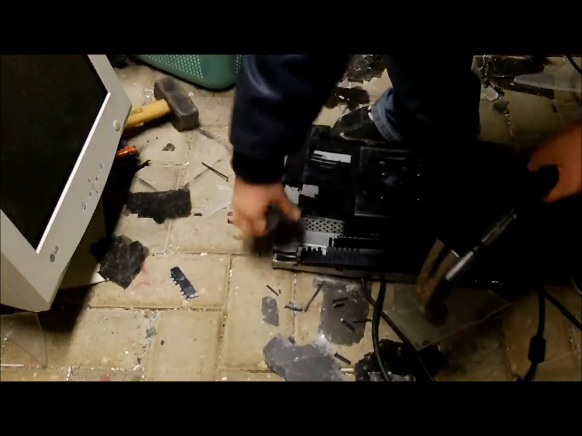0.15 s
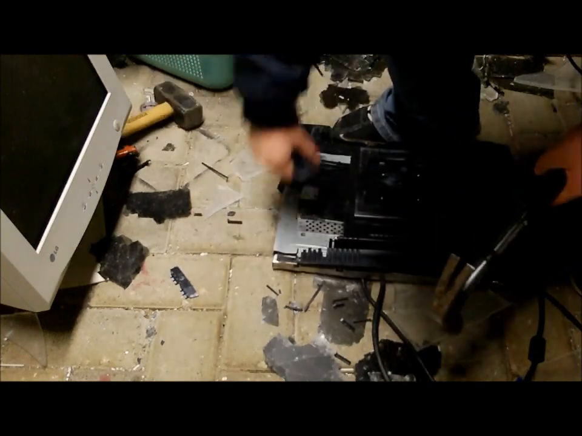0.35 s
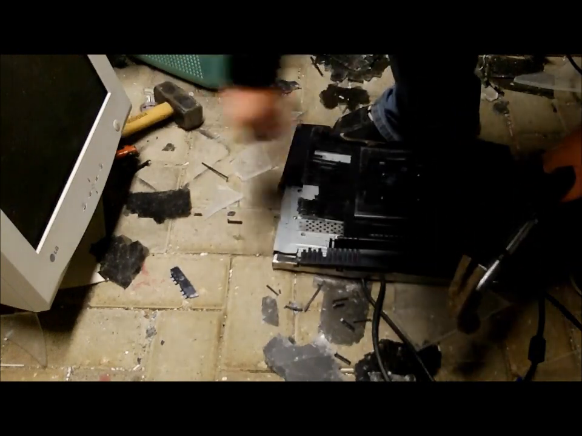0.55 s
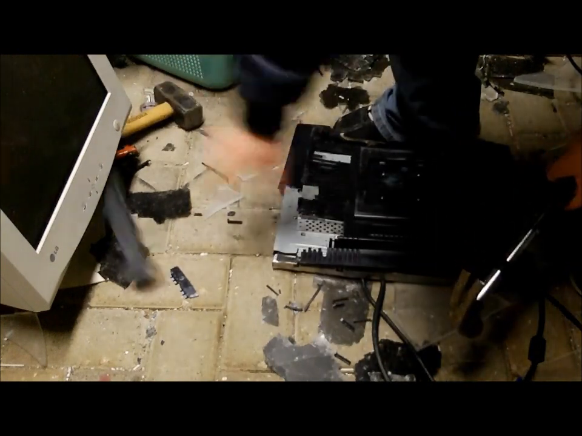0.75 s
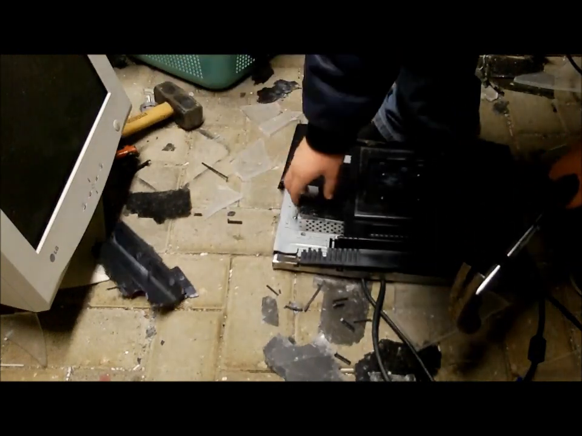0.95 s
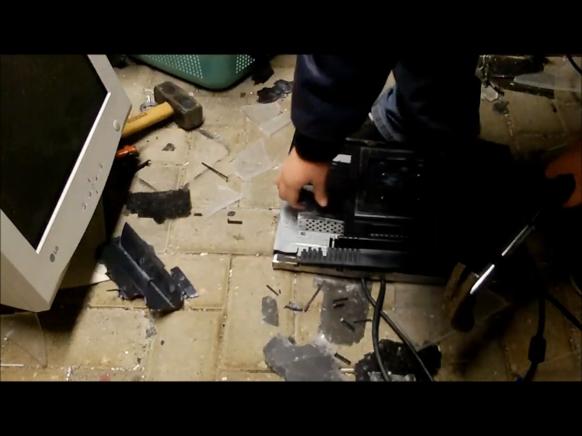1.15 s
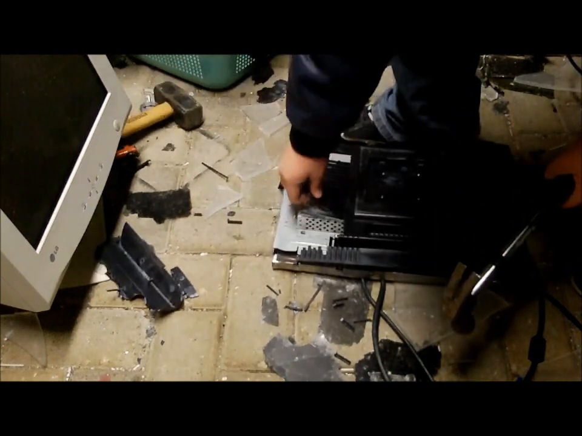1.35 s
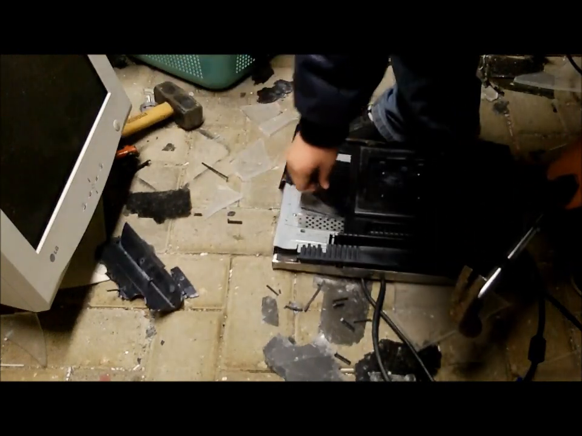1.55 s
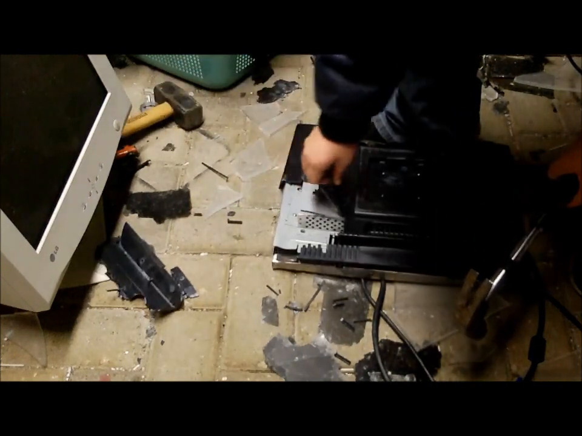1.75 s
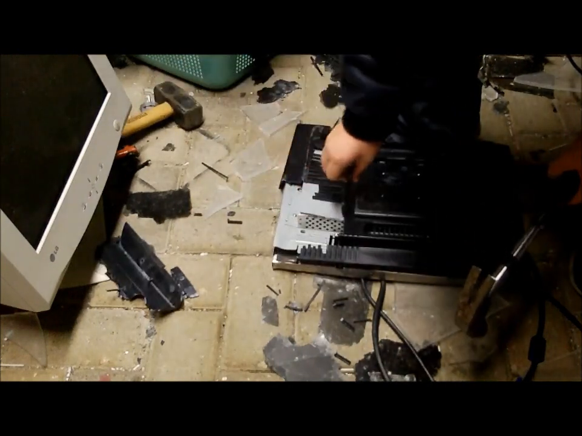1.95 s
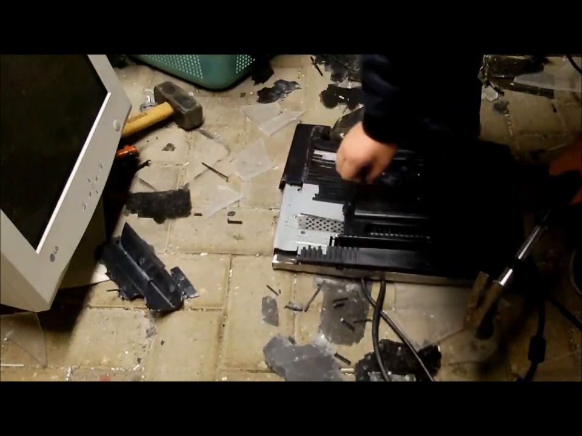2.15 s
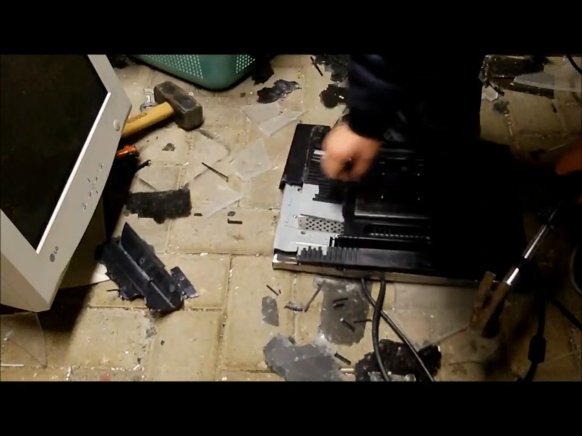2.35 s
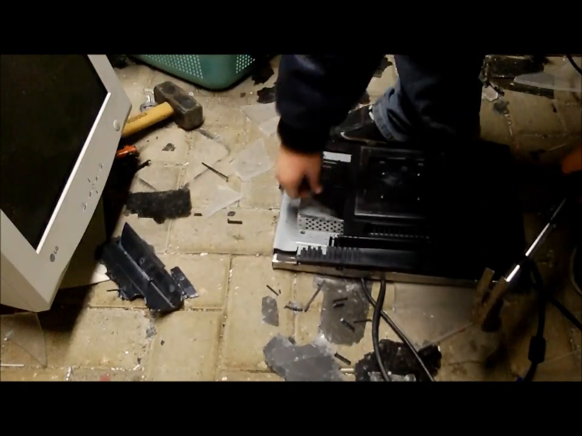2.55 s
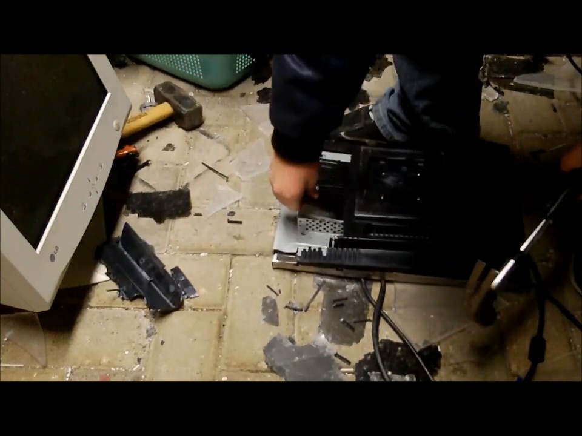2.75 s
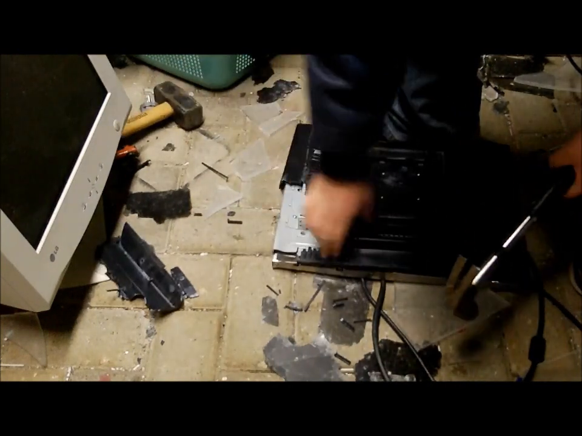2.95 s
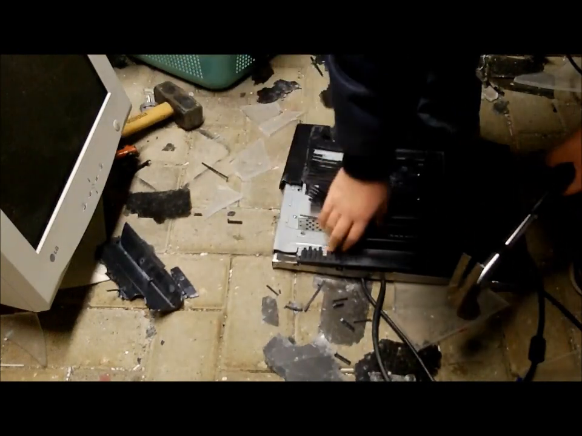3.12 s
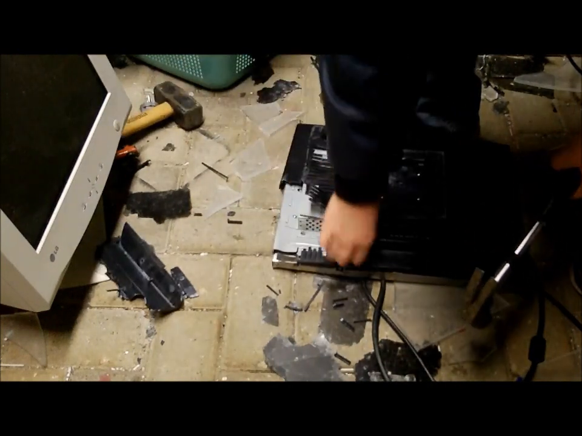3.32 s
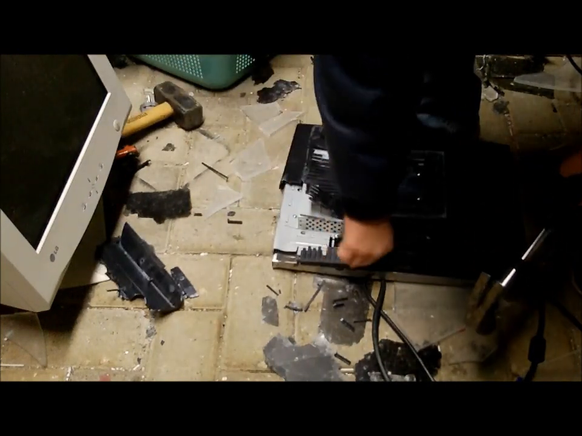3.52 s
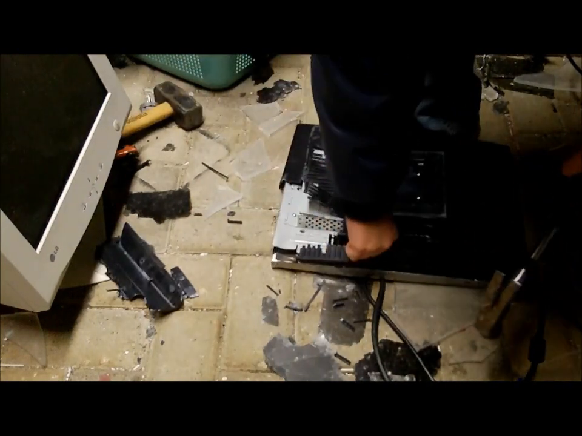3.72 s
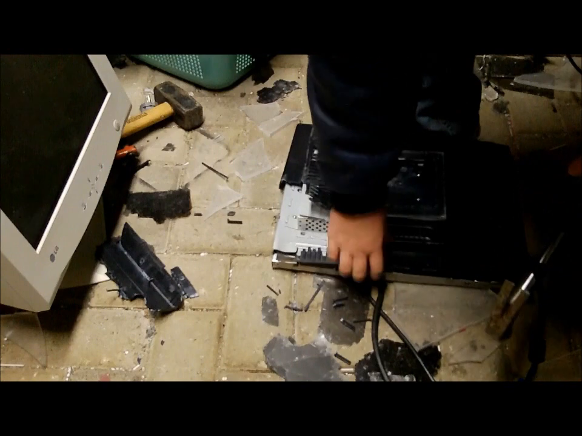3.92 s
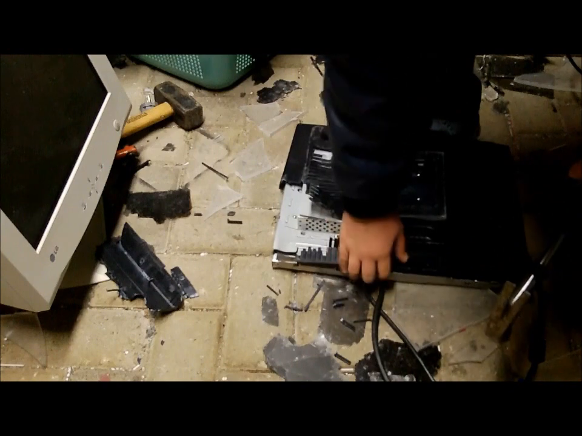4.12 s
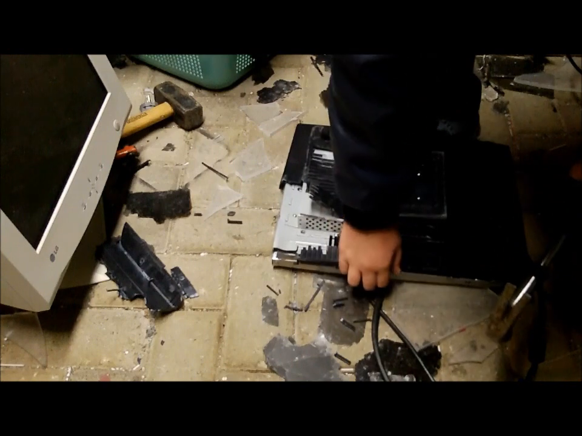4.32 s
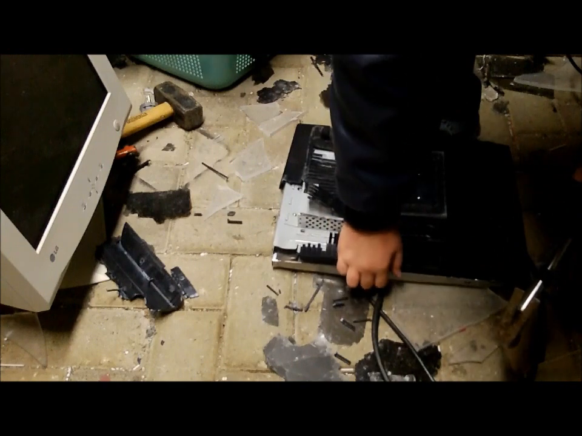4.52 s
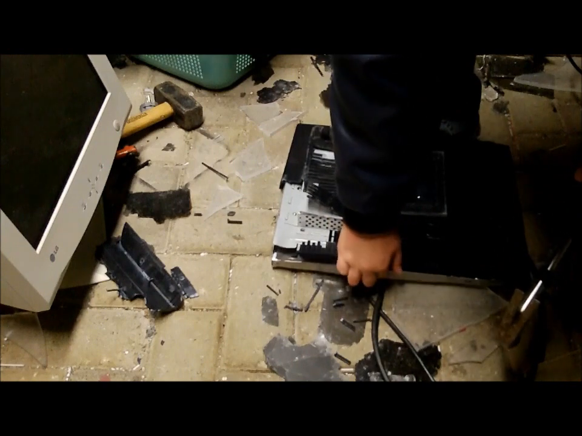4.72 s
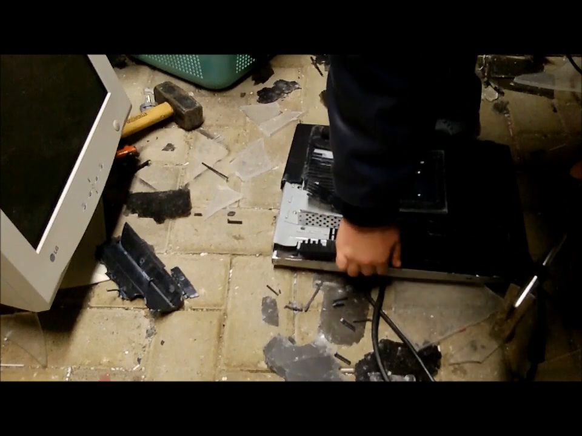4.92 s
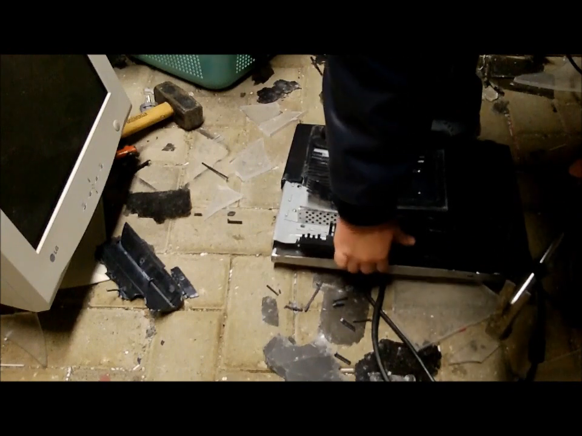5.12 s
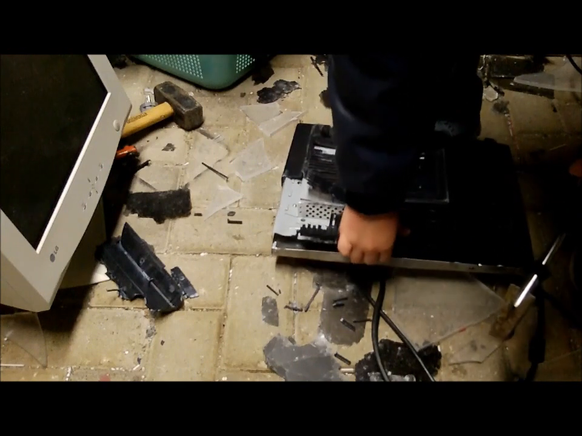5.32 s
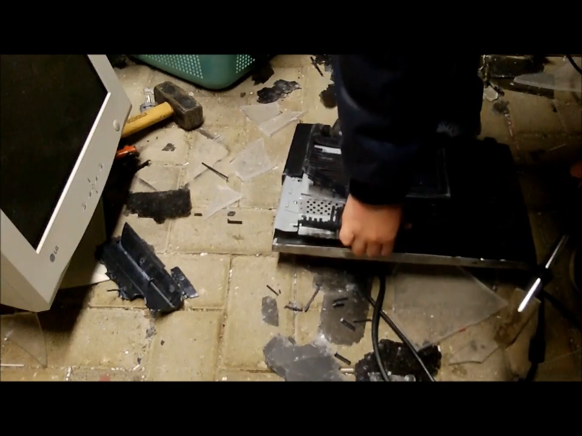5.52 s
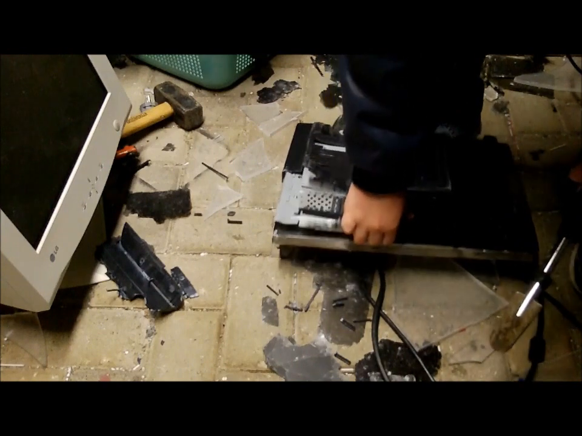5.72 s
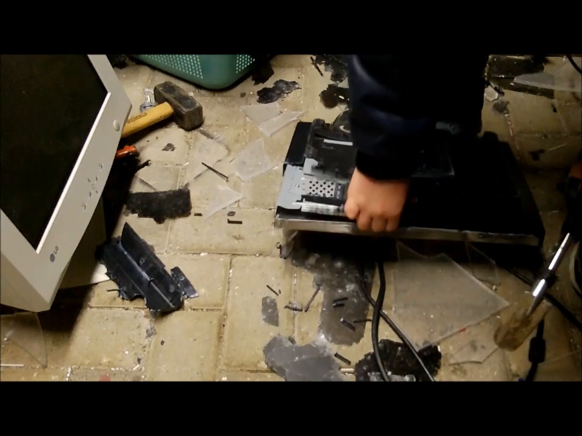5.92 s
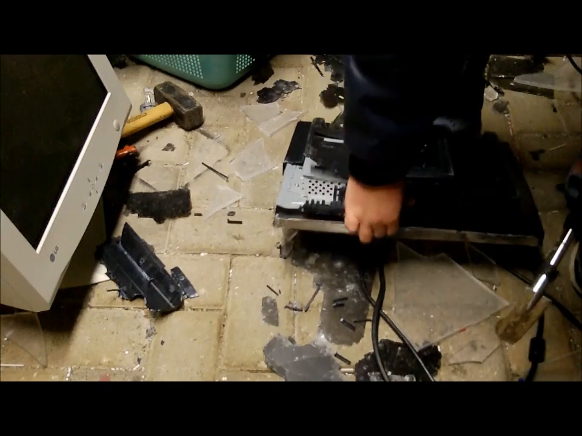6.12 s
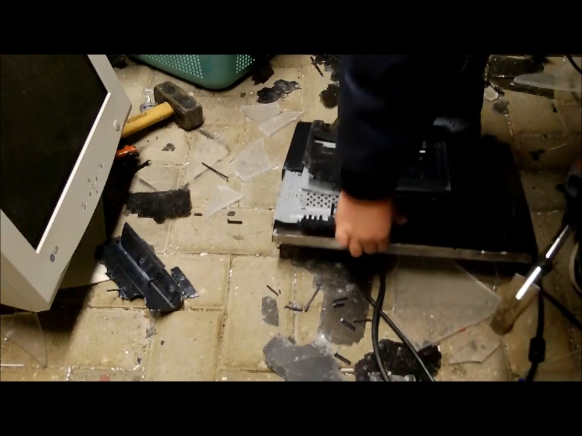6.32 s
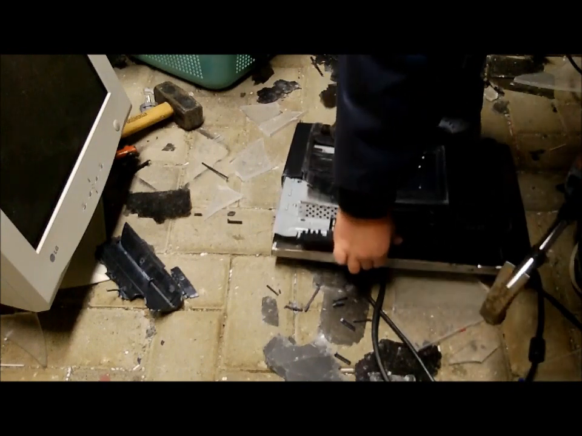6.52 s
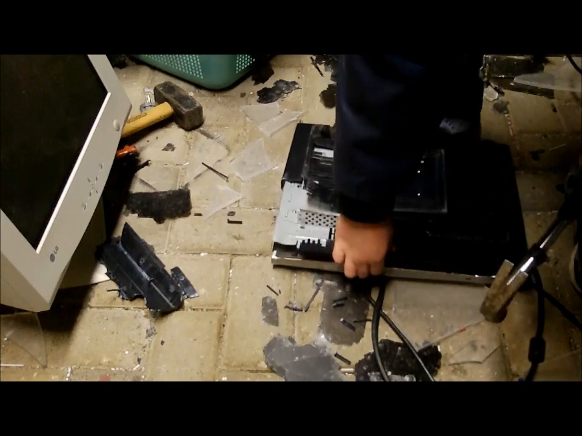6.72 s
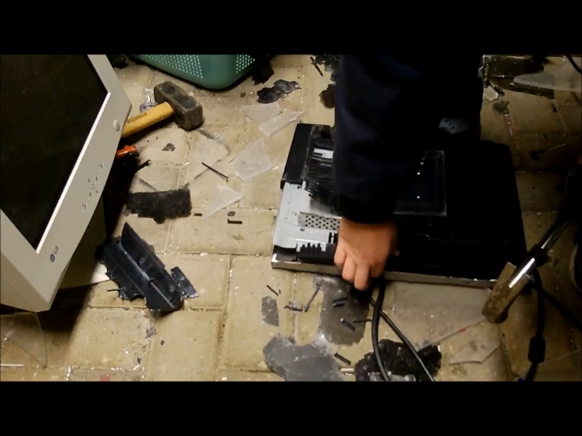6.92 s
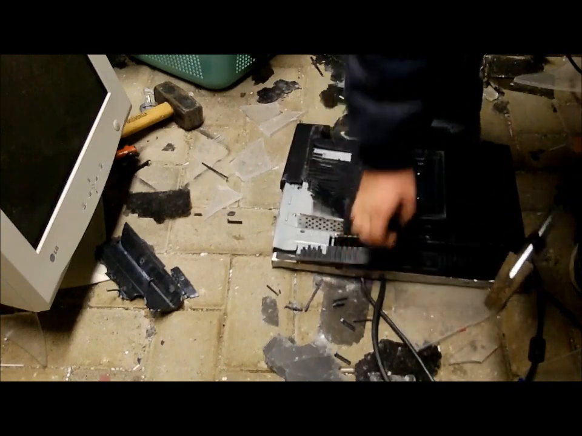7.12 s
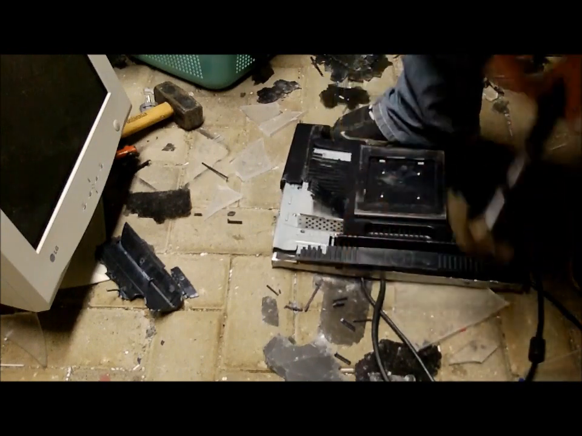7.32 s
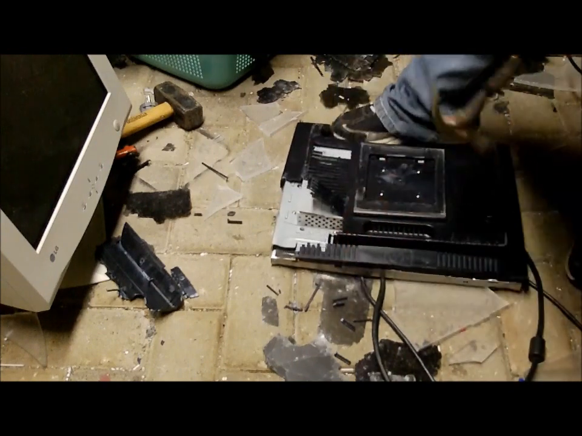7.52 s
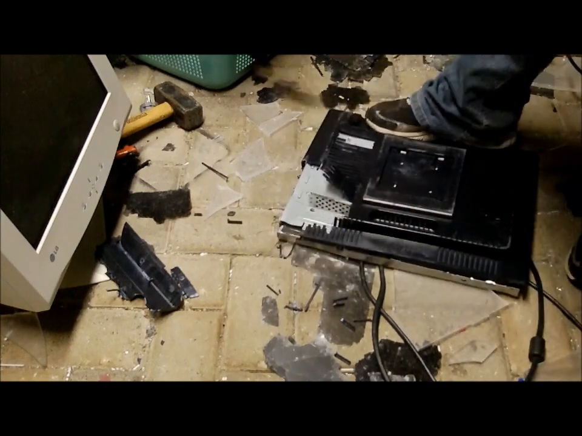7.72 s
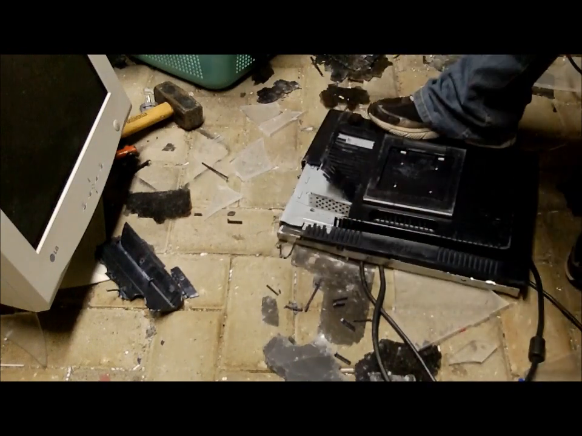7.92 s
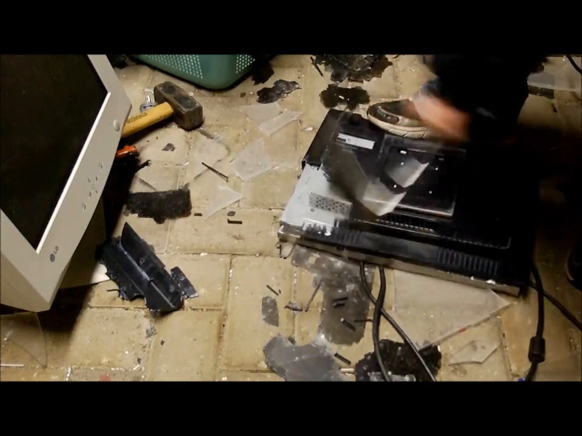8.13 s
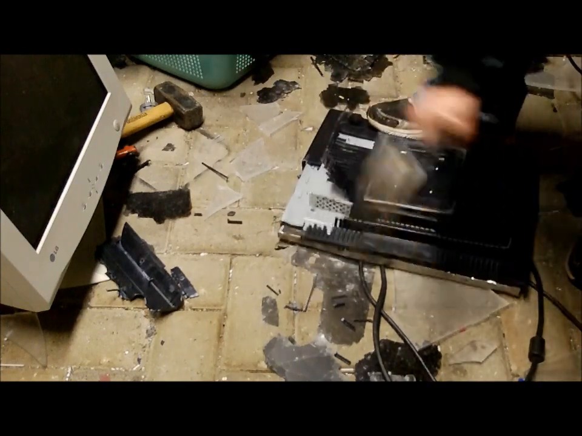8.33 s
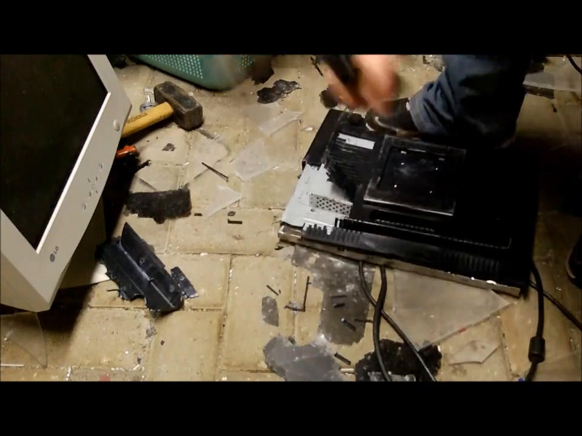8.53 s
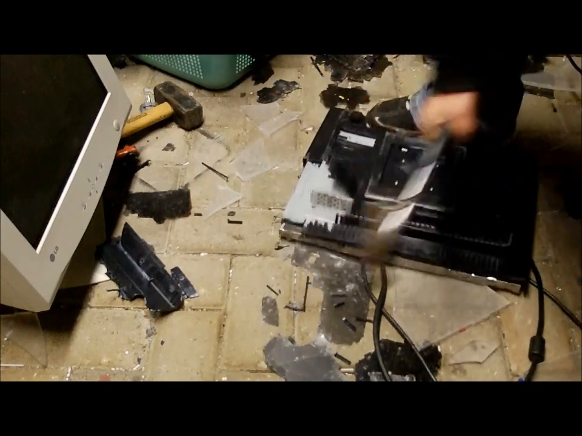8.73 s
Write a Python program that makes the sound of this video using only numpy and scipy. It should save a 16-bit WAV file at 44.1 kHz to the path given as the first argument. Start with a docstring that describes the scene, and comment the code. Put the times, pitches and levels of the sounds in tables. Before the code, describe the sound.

A plastic strip tears off a flat monitor with loud cracks, then lands and bounces on the tiled floor. Smaller snaps, ticks and gritty hand rubbing follow as the back is pried. The case clacks, drops and clatters with a short skid under a shoe. Two very loud hammer blows crunch into it, overloading the close microphone. The room is small and hard, with a faint rumble and hiss.

```python
"""Breaking up a flat monitor

On the tiled floor of a small hard room, a strip of the plastic back is torn off and thrown,
more plastic snaps, the case is lifted, dropped and stepped on, and two hammer blows smash into it.
Each hit is a spray of micro-cracks that sets one part and the room ringing; rubbing is many tiny
slips. The loud hits overload the close microphone."""
import sys
import numpy as np
from scipy import signal
from scipy.io import wavfile

SR = 44100
rng = np.random.default_rng(int(sys.argv[2]) if len(sys.argv) > 2 else 0)


def master_out(mix):
    """Clip the mix to full scale and print it as 16-bit PCM to the path in sys.argv[1]."""
    frames = np.transpose(np.atleast_2d(mix))
    ceiling = np.clip(frames, -1, 1)
    pcm = np.round(ceiling * 32767).astype(np.int16)
    wavfile.write(sys.argv[1], SR, pcm)


N = 386316
TOP_HZ = 16000


def amp(db):
    """Decibels to gain."""
    return 10 ** (np.asarray(db) / 20)


def unit(x):
    """Scales to rms 1."""
    return x / np.sqrt(np.mean(x ** 2) + 1e-20)


def read(curve, hz):
    """Reads a curve on a log-frequency axis."""
    f, value = np.transpose(curve)
    return np.interp(np.log(hz + 1), np.log(f + 1), value)


def add(mix, start_s, sound):
    """Adds a sound into the mix."""
    part = mix[max(round(start_s * SR), 0):][:len(sound)]
    part += sound[:len(part)]


def colour(x, curve, size=2048):
    """Minimum-phase filter along a curve of f/Hz, gain/dB."""
    log_gain = np.log(amp(read(curve, abs(np.fft.fftfreq(size, 1 / SR)))))
    taps = np.fft.ifft(np.exp(np.conj(signal.hilbert(log_gain)))).real
    return signal.oaconvolve(x, taps[:size // 2])[:len(x)]


def drift(t, per_s, count=256):
    """Random wander of about unit size."""
    return np.interp(t * per_s, np.arange(count), rng.standard_normal(count))


# background spectrum: f/Hz, gain/dB
NOISE_COLOUR = [(10, -4.5), (27, 9), (45, -5.5), (70, -1.5), (125, -13), (250, -19), (600, -20.5),
                (1300, -22.5), (2500, -29), (5000, -32), (10000, -36), (14500, -28), (16000, -40)]

def background(level_db, swell_db):
    """Low rumble and even hiss, swelling slightly."""
    gain = amp(level_db + swell_db * drift(np.arange(N) / SR, 6.4))
    return gain * unit(colour(rng.standard_normal(N), NOISE_COLOUR, size=8192))


# hum tones: f/Hz, level/dB, start/s, end/s
HUM_TONES = [(135, -40.5, 4.55, 4.98), (201, -52, 4.6, 7.1), (203, -45, 5.0, 5.4), (306, -57.5, 1.9, 8.1)]

def far_hum(waver, flutter_db):
    """Faint low tones come and go, wavering in pitch and level."""
    out = np.zeros(N)
    for hz, db, start_s, end_s in HUM_TONES:
        t = np.arange(0, end_s - start_s, 1 / SR)
        pitch_hz = hz * (1 + waver * drift(t, 4.2))
        tone = unit(np.sin(2 * np.pi * np.cumsum(pitch_hz) / SR))
        gain = amp(db + flutter_db * drift(t, 8.3))
        add(out, start_s, gain * tone * signal.windows.tukey(len(t), 0.4))
    return out


# room reverberation: f/Hz, t60/s
ROOM_DECAY = [(100, 0.26), (400, 0.29), (1000, 0.31), (2200, 0.36), (4500, 0.35), (9000, 0.31),
              (16000, 0.26)]

def room_echoes(build_s, size=256):
    """Dense echoes of energy 1 build up and die, in a new pattern for each spot."""
    hz, t, spectra = signal.stft(rng.standard_normal(SR // 2), SR, nperseg=size)
    decay = np.exp(-np.log(1000) * t / read(ROOM_DECAY, hz)[:, None])
    tail = signal.istft(spectra * decay, SR, nperseg=size)[1][:SR // 2]
    tail *= np.sqrt(1 - np.exp(-np.arange(len(tail)) / SR / max(build_s, 1e-4)))
    return tail / np.linalg.norm(tail)


def pressure(strokes, attack_s, release_s):
    """Each stroke bears down, holds and lets go."""
    out = np.zeros(N)
    for start_s, length_s, db in strokes:
        t = np.arange(0, length_s + 10 * release_s, 1 / SR)
        release = np.exp(-np.maximum(t - length_s, 0) / release_s)
        add(out, start_s, amp(db) * np.minimum(t / attack_s, 1) * release)
    return out


def rubbing(strokes, contact, gain_db, slips_per_s, spread_db, attack_s, release_s):
    """Gritty friction: tiny slips of uneven size under the stroke's pressure, plus room echoes."""
    slips = (rng.random(N) < slips_per_s / SR) * rng.standard_normal(N)
    slips *= amp(spread_db * np.minimum(rng.exponential(1, N), 4))
    direct = unit(colour(slips, contact)) * pressure(strokes, attack_s, release_s)
    return amp(gain_db) * (direct + signal.oaconvolve(direct, room_echoes(0.002))[:N])


# drags: t/s, length/s, level/dB
DRAG_STROKES = [(0, 0.28, -29.5), (4.29, 0.52, -42.5), (4.9, 2, -48)]
# case on floor: f/Hz, gain/dB
DRAG_CONTACT = [(20, -25), (60, 0), (140, -1), (300, -9), (700, -12.5), (2000, -42), (8000, -44)]

def case_drag():
    """The case rumbles as it is dragged and tilted on the floor."""
    return rubbing(DRAG_STROKES, DRAG_CONTACT, gain_db=-3.5, slips_per_s=1500, spread_db=2,
                   attack_s=0.01, release_s=0.042)


# grips: t/s, length/s, level/dB
HAND_STROKES = [(.03, 0.14, -23.5), (1.36, .17, -40), (2.33, 0.25, -42), (3.04, .1, -56),
                (3.282, 0.036, -24.5), (3.46, 0.091, -42), (3.73, .15, -32), (3.97, 0.64, -54.5),
                (4.42, 0.667, -40.5), (5.92, 0.39, -48), (6.84, .4, -38.5), (7.92, 0.35, -41)]
# hand on plastic: f/Hz, gain/dB
HAND_CONTACT = [(100, -18), (350, 6), (750, 1.5), (1500, -2.5), (2500, -5.5), (5000, -8), (11000, -14),
                (16000, -44)]

def hand_rub():
    """A hand grips and works at the case."""
    return rubbing(HAND_STROKES, HAND_CONTACT, gain_db=-5.5, slips_per_s=740, spread_db=3.5,
                   attack_s=0.01, release_s=0.021)


# slides: t/s, length/s, level/dB
SLIDE_STROKES = [(1.41, 0.034, -43.5), (4.445, 0.084, -45), (4.75, .05, -39), (5.88, 0.24, -48),
                 (6.365, 0.097, -50), (7.3, .08, -33.5), (7.44, 0.21, -38.5)]
# sleeve or shoe on plastic: f/Hz, gain/dB
SLIDE_CONTACT = [(100, -4), (500, 0.5), (1500, -0.5), (4500, 1), (7000, -5), (11000, -2), (16000, -13)]

def sleeve_and_shoe():
    """Sleeve and shoe slide over the case."""
    return rubbing(SLIDE_STROKES, SLIDE_CONTACT, gain_db=1, slips_per_s=1800, spread_db=-1.5,
                   attack_s=0.05, release_s=0.02)


def fracture(t, crumble_s, jolt_db, grain_db):
    """A first jolt, then a dying spray of micro-cracks of uneven size."""
    jolt = rng.standard_normal(len(t)) * np.exp(-t / 0.00034)
    sizes = amp(grain_db * np.repeat(rng.standard_normal(len(t)), SR // 1000)[:len(t)])  # 1 ms grains
    spray = rng.standard_normal(len(t)) * sizes * np.exp(-t / max(crumble_s, 1e-4))
    return amp(jolt_db) * unit(jolt) + unit(spray)


def ring(t, modes, waver, spot_db=4):
    """Dying modes vary in level with the spot struck and beat once their echoes arrive."""
    beat = waver * (1 - np.exp(-t / 0.017))
    out = np.zeros(len(t))
    for hz, db, t60_s in modes:
        envelope = amp(db + spot_db * rng.standard_normal()) * np.exp(-np.log(1000) * t / t60_s)
        phase = 2 * np.pi * hz * t + beat * drift(t, 90)
        out += envelope * np.sin(phase) * (1 + beat * drift(t, 91.8))
    return out


# thud, middle, edge and snap bands: low/Hz, high/Hz
HIT_BANDS = [(150, 900), (900, 2500), (2500, 7000), (7000, 16000)]

def balance(x, levels_db):
    """Filters a hit towards four band levels over its first 30 ms."""
    hz, power = signal.periodogram(x[:round(0.03 * SR)], SR, scaling="spectrum")
    have_db = [10 * np.log10(power[(hz >= lo) & (hz < hi)].sum() + 1e-20) for lo, hi in HIT_BANDS]
    thud, middle, edge, snap = np.subtract(levels_db, have_db)
    curve = [(720, thud), (1100, middle), (2200, middle), (2900, edge), (6000, edge), (9000, snap)]
    return colour(x, curve)


def hits(rows, contact, modes, gain_db, wet_db, jolt_db, grain_db, waver,
         crumble_s, ring_db, edge_db, edge_share, ripple_db=4):
    """Fractures that echo and ring one part. A row's thud and snap are relative to its mid-band level."""
    out, t = np.zeros(N), np.arange(SR // 2) / SR
    hz = np.geomspace(80, TOP_HZ, 60)
    for start_s, db, thud_db, snap_db in rows:
        spray_s = crumble_s * amp(0.14 * db)  # stronger hits crumble longer
        # each spot has its own damped resonances
        spot = np.transpose([hz, read(contact, hz) + ripple_db * rng.standard_normal(len(hz))])
        direct = unit(colour(fracture(t, spray_s, jolt_db, grain_db), spot))
        echoes = unit(colour(room_echoes(0.0005 + spray_s), spot))
        ringing = amp(ring_db - 0.67 * snap_db) * unit(ring(t, modes, waver))  # brittle hits ring less
        sound = unit(direct + amp(wet_db) * echoes) + ringing
        bands_db = [thud_db, 0, edge_db + edge_share * snap_db, snap_db]
        add(out, start_s, amp(db + gain_db) * balance(sound, bands_db))
    return out


# cracks: t/s, level/dB, thud/dB, snap/dB
CRACK_HITS = [(0.1842, -12.5, -5.5, 0), (1.3367, -55, -15, 4), (1.8402, -14.5, -5, 6),
              (2.0839, -34.5, -10, 6), (2.118, -19, -6, 12), (2.5296, -49, 3, 1), (2.6522, -31.5, -3.5, -1),
              (2.8252, -27.5, -11.5, -6), (3.1275, -42, 3.5, -4), (3.5629, -51.5, 11, 5.5),
              (3.754, -38, 8, 0), (3.7719, -27.5, 2.5, -0.5), (4.4449, -37, 4, -4.5),
              (4.512, -39.5, 0, -13), (5.1296, -35.5, -2, -6.5), (5.4958, -35, -17, -4.5),
              (5.8745, -47.5, -13, 2), (7.1203, -40.5, 5, 12.5), (8.4313, -36, -2.5, 11),
              (8.476, -46.5, -8, 16.5)]
# cracking plastic: f/Hz, gain/dB
CRACK_CONTACT = [(80, -17.5), (250, -8.5), (500, 0), (900, 2.5), (2000, 5), (3000, -3), (4500, -2),
                 (7000, -4), (10500, 2), (16000, -4)]
# splinter modes: f/Hz, level/dB, t60/s
SPLINTER_RING = [(1020, -9, 0.59), (1317, -4, 0.3), (1864, 3, 0.3), (2625, 4, 0.19), (2900, 1, 0.2),
                 (3320, 2, 0.12), (4330, -4.5, 0.14)]

def plastic_cracks():
    """Plastic cracks and small splinters tick."""
    return hits(CRACK_HITS, CRACK_CONTACT, SPLINTER_RING, gain_db=2.22, wet_db=2.5, jolt_db=-18,
                grain_db=6.5, waver=0.85, crumble_s=0.0062, ring_db=-13.5, edge_db=1.16, edge_share=0.66)


# flicks: t/s, level/dB, thud/dB, snap/dB
PING_HITS = [(4.6122, -41.5, 2, -3.5), (4.8689, -36.5, -5, -6)]

def splinter_pings():
    """Loose splinters ping when flicked."""
    return hits(PING_HITS, CRACK_CONTACT, SPLINTER_RING, gain_db=-0.1, wet_db=6, jolt_db=-6,
                grain_db=10, waver=0.72, crumble_s=0.0077, ring_db=-8.5, edge_db=10, edge_share=0.18)


# tab release: t/s, level/dB, thud/dB, snap/dB
TAB_HITS = [(1.7306, -29.5, 8.9, -6)]
# tab modes: f/Hz, level/dB, t60/s
TAB_RING = [(400, 0.5, 0.4), (773, -15.5, 0.44), (1017, -14, 0.5)]

def tab_twang():
    """A bent tab springs back."""
    return hits(TAB_HITS, CRACK_CONTACT, TAB_RING, gain_db=0.5, wet_db=7, jolt_db=-12,
                grain_db=-11, waver=0.15, crumble_s=0.0125, ring_db=-3.5, edge_db=4, edge_share=0.3)


# clacks: t/s, level/dB, thud/dB, snap/dB
PANEL_HITS = [(0.1291, -24, -8, -26), (2.4544, -43, -5, -10.5), (3.8739, -28.5, -1, -16.5),
              (4.749, -36.5, -3, -5), (4.9665, -33.5, -8, -9), (5.1919, -11, -7.5, -21),
              (6.9141, -7.5, -11, -14)]
# panel on frame: f/Hz, gain/dB
PANEL_CONTACT = [(80, -10.5), (300, -28.5), (650, -5), (1300, 0.5), (2000, 1), (2800, -14), (4200, -13),
                 (7000, -18.5), (11000, -5.5), (16000, -18.5)]
# panel modes: f/Hz, level/dB, t60/s
PANEL_RING = [(706, -3.5, 0.17), (1205, 2.5, 0.29), (1260, 6.5, 0.11), (1397, -18, 0.061),
              (1800, -24.5, 0.22), (1770, 5, 0.17), (1895, -3, 0.21), (2470, -9, 0.07)]

def panel_clacks():
    """The pried back panel clacks against its frame."""
    return hits(PANEL_HITS, PANEL_CONTACT, PANEL_RING, gain_db=2.5, wet_db=3, jolt_db=-9.5,
                grain_db=4, waver=1, crumble_s=0.004, ring_db=-14.5, edge_db=-0.5, edge_share=0.36)


# knocks: t/s, level/dB, thud/dB, snap/dB
CASE_HITS = [(0.001, -14, 0, -9), (0.1688, -15, -12.5, -27), (3.302, -27.5, -3.5, -16.5),
             (3.5934, -54.5, 15, -16), (4.11, -52, 9.5, -11), (4.2149, -49, 7, -9),
             (5.4535, -28.5, 6.5, -17.5), (5.5287, -26, 3.5, -13), (5.6015, -17.5, 4.5, -6.5),
             (6.078, -47.5, 3, -12), (6.7084, -45.5, 5, -6.5), (6.8929, -34, 1, -10),
             (7.0098, -15, -1, 2.5), (7.0261, -13.5, 2.5, -7), (7.4253, -35, 1, -4), (7.482, -28, 1, -13),
             (7.4978, -31, 8.5, -12), (7.5375, -13.5, -4, -13), (7.5979, -9, -11.5, -8),
             (7.6312, -8, -5, -14), (7.656, -13, 0, -11.5), (7.793, -20, 1.5, -18)]
# knocked case: f/Hz, gain/dB
CASE_CONTACT = [(80, -13.5), (250, -12.5), (450, -0.5), (700, 1.5), (1200, -5.5), (2000, -11),
                (4000, -12.5), (7000, -15), (11000, -11.5), (16000, -16.5)]
# case modes: f/Hz, level/dB, t60/s
CASE_RING = [(479, -11, 0.15), (545, 1, 0.27), (693, 5.5, 0.18), (752, 6.5, 0.26), (980, 2, 0.12),
             (1990, -7, 0.15), (3500, -18, .15)]

def case_knocks():
    """The whole case knocks against tiles, hand and shoe."""
    return hits(CASE_HITS, CASE_CONTACT, CASE_RING, gain_db=-0.5, wet_db=5.5, jolt_db=-12.5,
                grain_db=-2, waver=0.39, crumble_s=0.0053, ring_db=-13.5, edge_db=1.5, edge_share=0.67)


# skid: t/s, length/s, level/dB
SKID_STROKES = [(7.575, 0.066, -9.5)]

def case_skid():
    """The case judders over the tiles under the foot."""
    return rubbing(SKID_STROKES, CASE_CONTACT, gain_db=-1.5, slips_per_s=1300, spread_db=0,
                   attack_s=0.0085, release_s=0.01)


# breaks: t/s, level/dB, thud/dB, snap/dB
BREAK_HITS = [(0.247, -14.5, -5, 1.5), (0.2854, 0, -10.5, -8.5), (0.3193, -8.5, -9, -21)]
# plastic strip: f/Hz, gain/dB
STRIP_CONTACT = [(80, -16), (300, -11.5), (700, -0.5), (1300, 2.5), (2000, 2.5), (3400, 1.5), (5000, -3),
                 (7000, -8), (11000, -3.5), (16000, -10)]
# modes of the breaking strip: f/Hz, level/dB, t60/s
BREAK_RING = [(525, -16, 0.31), (1480, -3.5, 0.25), (1739, -15, 0.5), (1870, 4.5, 0.28), (2110, -0.5, 0.38),
              (3630, -1.5, 0.18), (3637, -12, 0.48)]

def strip_break():
    """A strip of the back breaks free in coarse cracks."""
    return hits(BREAK_HITS, STRIP_CONTACT, BREAK_RING, gain_db=-0.5, wet_db=12, jolt_db=-1,
                grain_db=14, waver=0.87, crumble_s=0.007, ring_db=-8, edge_db=2.9, edge_share=0.56)


# bounces: t/s, level/dB, thud/dB, snap/dB
BOUNCE_HITS = [(0.6972, -5.5, -6, -5.5), (0.764, -5.5, -2, -5), (0.8018, -22.5, 6.5, -6),
               (0.8532, -24, 2.5, 8.5), (0.9062, -15, -12, -6), (0.9911, -7, -19, -25.5),
               (1.0279, -19.5, -4.5, -8.5)]
# modes of the loose strip: f/Hz, level/dB, t60/s
STRIP_RING = [(392, -18, 0.83), (1200, -32, 0.22), (2320, -2, 0.47), (2380, 1.5, 0.4), (2760, -7, 0.34),
              (3330, 2, 0.3), (3740, 3.5, 0.25)]

def strip_bounces():
    """The thrown strip lands and bounces."""
    return hits(BOUNCE_HITS, STRIP_CONTACT, STRIP_RING, gain_db=-1, wet_db=3, jolt_db=-4.5,
                grain_db=3, waver=1, crumble_s=0.0066, ring_db=-15.5, edge_db=4.5, edge_share=0.2)


# blows and rebounds: t/s, level/dB, thud/dB, snap/dB
HAMMER_HITS = [(8.1345, 7, -2, -1), (8.19, -2.5, -0.5, 1), (8.255, -3.5, -1.5, -6.5), (8.3, -11, -4, 1),
               (8.6075, 17, -4.5, -2), (8.68, 11.5, -7, -3.5), (8.725, 15, -8, -4.5)]
# hammer on case: f/Hz, gain/dB
HAMMER_CONTACT = [(80, -10), (250, -10.5), (450, -2), (700, -1), (1100, -9), (1800, -9), (3500, -16.5),
                  (6000, -17.5), (11000, -6.5), (16000, -12)]
# frame modes: f/Hz, level/dB, t60/s
FRAME_RING = [(524, -9, 0.32), (570, -18, 0.22), (682, 1, 0.45), (757, 2.5, 0.37), (1200, -5.5, 0.46),
              (1710, -4.5, 0.28), (2420, -21, 0.26)]

def hammer_blows():
    """The hammer smashes into the case, which jumps on the floor."""
    return hits(HAMMER_HITS, HAMMER_CONTACT, FRAME_RING, gain_db=-4.5, wet_db=3.5, jolt_db=1,
                grain_db=5, waver=1, crumble_s=0.023, ring_db=-15, edge_db=1.4, edge_share=0.24)


# stereo side signal: f/Hz, gain/dB
SIDE_COLOUR = [(100, -29), (300, -30), (700, -53.5), (2500, -65.5), (5000, -48.5), (8000, -25.5),
               (14000, -38.5)]

def scene():
    """All sources meet at the microphone, almost alike on both channels."""
    mix = plastic_cracks() + case_knocks() + panel_clacks() + strip_break() + strip_bounces()
    mix += splinter_pings() + tab_twang() + hammer_blows()
    mix += hand_rub() + sleeve_and_shoe() + case_skid() + case_drag()
    mix += background(level_db=-37.2, swell_db=0.6) + far_hum(waver=0.0105, flutter_db=-2)
    side = colour(signal.oaconvolve(mix, room_echoes(0.00067))[:N], SIDE_COLOUR)
    return np.array([mix + side, mix - side])


def limiter(x, ceiling_db, attack_s, recovery_db_per_s):
    """Gain drops fast while the sound is over the ceiling, then recovers."""
    pole = np.exp(-1 / (attack_s * SR))
    power_db = 10 * np.log10(signal.lfilter([1 - pole], [1, -pole], (x ** 2).mean(0)) + 1e-12)
    fall_db = np.arange(N) * recovery_db_per_s / SR
    held_db = np.maximum.accumulate(power_db + fall_db) - fall_db
    return x / amp(np.maximum(held_db - ceiling_db, 0))


# microphone response, deep treble dip: f/Hz, gain/dB
MIC_RESPONSE = [(5000, -1), (6300, -4), (7200, -7), (7850, -20), (8500, -6), (9600, 0.5)]

def record(dry):
    """Microphone colour, limiter, clipping of the remaining peaks, band limit."""
    coloured = np.array([colour(channel, MIC_RESPONSE) for channel in dry])
    limited = limiter(coloured, ceiling_db=-1, attack_s=0.0027, recovery_db_per_s=182)
    lowpass = signal.firwin(401, TOP_HZ, window=("kaiser", 7), fs=SR)
    return signal.oaconvolve(np.clip(limited, -1, 1), lowpass[None], "same")


dry = scene()
out = record(dry)
master_out(out)
```